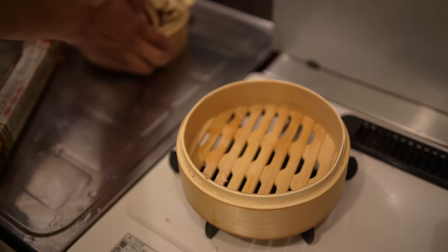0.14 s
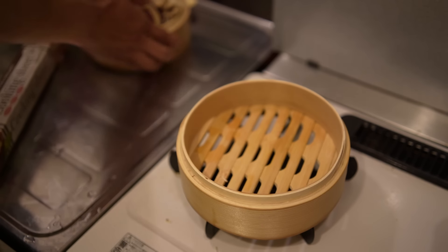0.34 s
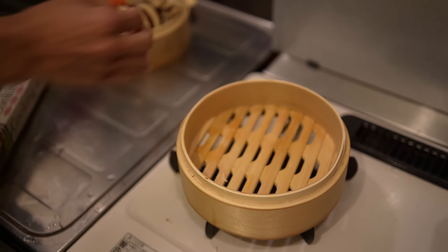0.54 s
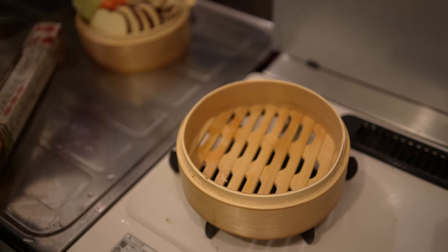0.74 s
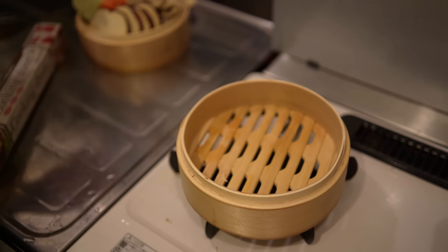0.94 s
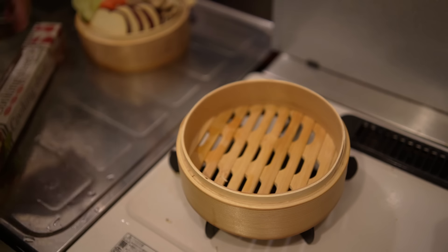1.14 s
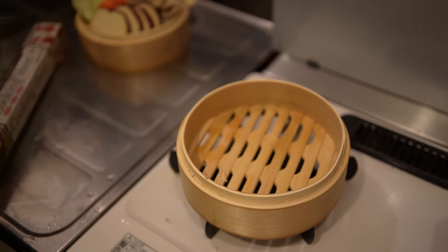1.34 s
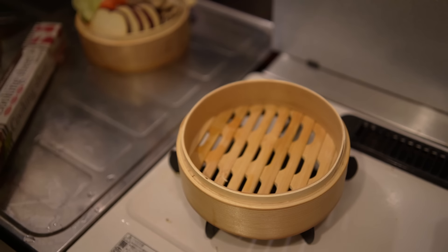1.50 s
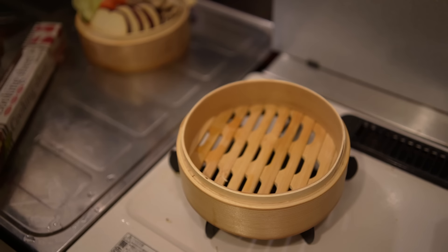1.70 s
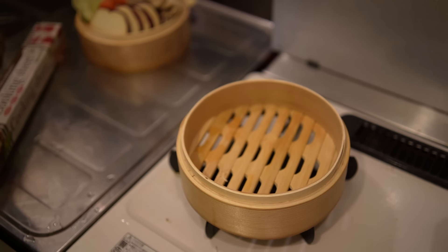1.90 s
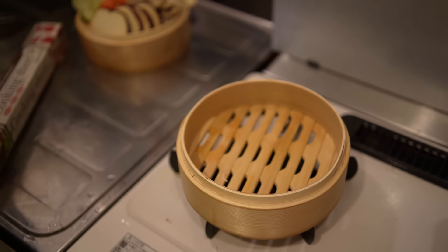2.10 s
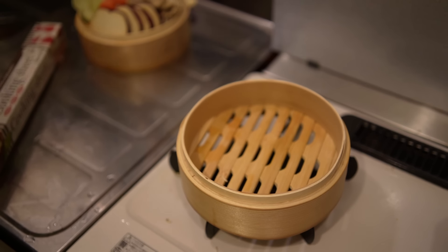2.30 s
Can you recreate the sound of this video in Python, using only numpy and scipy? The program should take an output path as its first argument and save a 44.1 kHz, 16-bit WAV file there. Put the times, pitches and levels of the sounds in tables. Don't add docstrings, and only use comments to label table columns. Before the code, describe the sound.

A hollow wooden knock as a bamboo steamer basket is set down on a steel counter

```python
import sys
import numpy as np
from scipy import signal
from scipy.fft import rfft, irfft
from scipy.io import wavfile
from scipy.ndimage import uniform_filter1d

SR = 44100
rng = np.random.default_rng(int(sys.argv[2]) if len(sys.argv) > 2 else 0)


def gain_from_decibels(decibels):
    exponent = np.asarray(decibels, float) / 20
    return 10 ** exponent


def wav_out(sig):
    wavfile.write(sys.argv[1], SR, np.round(np.clip(np.atleast_2d(sig).T, -1, 1) * 32767).astype(np.int16))


N = 103635


def basket_set_down():
    # (time [s], level [dB], push [ms], rattle [ms])
    contacts = [
        (.3975, -36, 0.46, 9),
        (.4015, -28.5, 0.31, 12),
        (.4045, -22, 1.66, 7.6),
        (.410, -30.5, 2.2, 4.1),
        (.4155, -27.5, 1.14, 10),
        (.432, -35.5, 1.2, 30),
        (.44, -41, 1.18, 10.6),
    ]
    # (frequency [Hz], level [dB], decay t60 [s])
    basket_modes = [(146.6, -2, 0.26), (260.7, 2, 0.31), (404, -8, 1), (499, 1, 0.18), (553.4, -25, 0.47),
                    (660.6, -19, 0.62), (741.7, 4, 0.13), (942, -7, 0.31), (1241, 4.5, 0.18),
                    (1316, -17, 0.26), (1250, -18.5, 0.34), (1540, -17.5, 0.16), (1610, 9, 0.12),
                    (2117, -4, 0.26)]
    # (frequency [Hz], level [dB], decay t60 [s])
    panel_modes = [(267, 8.5, 0.047), (118, -13, 0.37), (146.7, -22.5, 4.2), (189, -11, 0.46),
                   (365, 1, 0.089), (442, 5, 0.28), (560, -13, 1.12), (695, -14, 2), (937, 6, 0.34),
                   (1800, 7, .1)]
    shortened = [(hz, db, 0.72 * t60) for hz, db, t60 in basket_modes]
    return gain_from_decibels(14) * struck(contacts, shortened + list(panel_modes), crack_db=7, room_db=0.58, snap_db=-3)


def rim_touch():
    # (time [s], level [dB], push [ms], rattle [ms])
    contacts = [
        (.1893, -26, 1.9, 4),
        (.193, -40, .4, 16),
        (.205, -33, 1.8, 8),
        (.236, -32, 2, 8),
        (.2708, -36, 2, 8),
    ]
    # (frequency [Hz], level [dB], decay t60 [s])
    rim_modes = [(270, 13, .03), (151, -4, .3), (204, -4, .15), (258, 0, .18), (340, -4, .13),
                 (474, -11, .25), (590, -8, .25), (1163, -8, .1)]
    touch = gain_from_decibels(10) * struck(contacts, rim_modes, crack_db=1, room_db=-1, snap_db=-18)
    return high_pass(touch, 95)


def cupboard_bumps():
    # (time [s], level [dB], push [ms], rattle [ms])
    contacts = [
        (1.775, -48, 2.9, 120),
        (1.876, -36, 1.8, 24),
        (1.93, -38, 5.1, 17),
        (1.979, -34, 0.2, 39),
        (2.014, -30.5, 0.31, 6.6),
        (2.022, -25.5, 1.4, 6.5),
        (2.058, -35, 3, 19),
        (2.085, -46, 13, 25),
        (2.13, -42, 3.4, 20),
    ]
    # (frequency [Hz], level [dB], decay t60 [s])
    front_modes = [(301, 12.5, 0.029), (48, -5, 0.075), (84, -8.5, 0.17), (146.5, -8.5, 0.11),
                   (205, -8, 0.072), (271, -4, 0.13), (380, 4, 0.077), (502, 7, 0.033), (1120, -23, 0.068),
                   (1810, -12.5, 0.17), (2370, 1, 0.079)]
    return gain_from_decibels(8) * struck(contacts, front_modes, crack_db=0.68, room_db=-1.0, snap_db=-18)


def struck(contacts, modes, crack_db, room_db, snap_db):
    # (frequency [Hz], level [dB])
    crack_colour = [(30, -73), (70, -13.5), (200, 5), (900, 8), (2200, 3.5), (4000, -7), (16000, -1)]
    # (frequency [Hz], level [dB])
    snap_colour = [(2000, -7), (5000, -2.5), (16000, -10)]
    force, sharp = np.zeros(N + 5000), np.zeros(N + 5000)
    t_ms = np.arange(4096) / SR * 1000
    for start_s, db, push_ms, rattle_ms in contacts:
        start = int(start_s * SR)
        sparse = rng.random(4096) < .2
        taps = rng.standard_normal(4096) * sparse * .13 * np.exp(-t_ms / rattle_ms)
        sharp[start:][:4096] += taps * gain_from_decibels(db) / push_ms
        taps[0] = 1
        push = np.sin(np.pi * np.clip(t_ms[:400] / push_ms, 0, 1)) ** 2
        hit = np.convolve(taps, push / np.sqrt(np.sum(push ** 2))) * gain_from_decibels(db)
        force[start:][:len(hit)] += hit
    crack = colour(force[:N], crack_colour) * gain_from_decibels(crack_db)
    crack = crack + colour(sharp[:N], snap_colour) * gain_from_decibels(snap_db)
    ringing = signal.fftconvolve(force, ring(modes))[:N]
    return ringing + crack + gain_from_decibels(room_db) * room(crack)


def ring(modes, length_s=0.86):
    t = np.arange(int(length_s * SR)) / SR
    h = np.zeros(len(t))
    for hz, db, t60 in modes:
        h += gain_from_decibels(db - 60 * t / np.clip(t60, .02, 2.)) * np.sin(2 * np.pi * hz * t)
    return h / np.sqrt(np.sum(h ** 2))


def scuffs():
    # (start [s], swell [s], hold [s])
    motions = [
        (1.716, .018, .058),
        (1.839, .005, .046),
        (1.978, .0015, .004),
        (2.012, .0015, .012),
        (2.062, .014, .005),
        (2.105, .04, .034),
        (2.228, .02, .008),
    ]
    # (hiss [dB], rasp [dB], grit [dB])
    strengths = [
        (-48, -47.5, 1.5),
        (-42.5, -47, 2.3),
        (-63, -43, .8),
        (-62, -41, -2),
        (-40, -51, 3.5),
        (-40.5, -53.5, -1),
        (-41.5, -51.5, 2.5),
    ]
    # (frequency [Hz], level [dB])
    hiss_colour = [(2000, -30), (6000, 5.5), (10000, 4), (13000, 8), (16000, 18)]
    # (frequency [Hz], level [dB])
    rasp_colour = [(600, -3), (1300, -3.5), (1900, 2), (3000, 3), (6000, 2), (10000, -2), (16000, -8)]
    hiss_t60_s, rasp_t60_s = .14, 0.34
    t, hiss, rasp = np.arange(N) / SR, np.zeros(N), np.zeros(N)
    for (start, swell, hold), (hiss_db, rasp_db, grit_db) in zip(motions, strengths):
        rise = np.clip((t - start) / swell, 0, 1) ** 1.4
        after = np.maximum(t - start - swell - hold, 0)
        hiss_flutter_db = 1.1 * grit_db * np.clip(walk(300), -3, 1.6)
        hiss_gain = gain_from_decibels(hiss_db - 60 * after / hiss_t60_s + hiss_flutter_db)
        rasp_gain = gain_from_decibels(rasp_db - 60 * after / rasp_t60_s + walk(100))
        hiss += rise * hiss_gain * fibres(grit_db)
        rasp += rise * rasp_gain * fibres(0.85)
    return gain_from_decibels(-2.5) * colour(hiss, hiss_colour) + gain_from_decibels(6) * colour(rasp, rasp_colour)


def sleeve():
    # (time [s], level [dB])
    path = np.array([
        (0, -61),
        (.15, -70),
        (.3, -62.5),
        (.55, -63),
        (.7, -56),
        (.86, -64.5),
        (1.04, -71),
        (1.14, -61.5),
        (1.26, -76),
        (1.68, -93),
    ])
    # (frequency [Hz], level [dB])
    wool_colour = [(300, -43), (1500, -5.5), (4000, 10.5), (8000, 11), (12000, 9), (16000, 15.5)]
    path_db = np.interp(np.arange(N) / SR, path[:, 0], path[:, 1], right=-75)
    return colour(fibres(1.0), wool_colour) * gain_from_decibels(path_db - 2.0 + 0.62 * walk(5.3))


def fibres(grit_db):
    clicks_per_s = 2500
    size = gain_from_decibels(grit_db * np.minimum(rng.exponential(size=N), 3))
    size = size * (rng.random(N) < clicks_per_s / SR)
    clicks = size * np.clip(rng.standard_normal(N), -2, 2)
    return level(clicks + 0.2 * rng.standard_normal(N), 0)


def room(x):
    # (frequency [Hz], decay t60 [s])
    room_decay = [(60, 0.78), (250, 0.49), (700, 0.38), (2000, 0.32), (5000, 0.24), (12000, 0.092)]
    delay_s, late_db, late_stretch = 0.0017, -21.5, 2.5
    t = np.arange(SR) / SR
    spectrum = rfft(rng.standard_normal(SR))
    octave = np.log2(np.maximum(np.arange(SR // 2 + 1), 1))
    tail = np.zeros(SR)
    for centre in np.arange(5, 15, .5):
        band = irfft(spectrum * np.maximum(1 - 2 * abs(octave - centre), 0))
        t60 = shape(room_decay, 2 ** centre)
        tail += band * (gain_from_decibels(-60 * t / t60) + gain_from_decibels(late_db - 60 * t / t60 / late_stretch))
    tail *= np.clip(t / delay_s - 1, 0, 1)
    return signal.fftconvolve(x, tail / np.sqrt(np.sum(tail ** 2)))[:N]


def fan():
    # (frequency [Hz], level [dB])
    air_colour = [(20, 4), (48, -2), (150, -3), (700, -9), (1300, -16), (2200, -14.5), (5000, -19.5),
                  (16000, -22.5)]
    # (frequency [Hz], rms level [dB])
    hum = [(145.3, -65), (441.4, -65), (640.6, -68), (737.5, -73.5), (2137, -72), (2998, -80)]
    # (frequency [Hz], rms level [dB])
    whine = [(11520, -82), (11610, -83), (11870, -90), (11960, -76)]
    sound = level(colour(rng.standard_normal(N), air_colour), -51) * gain_from_decibels(.6 * walk(4))
    for hz, db in list(hum) + list(whine):
        phase = 2 * np.pi * np.cumsum(hz * (1 + 0.0011 * walk(4.9))) / SR
        sound = sound + np.sqrt(2) * gain_from_decibels(db + 2.2 * walk(5.78)) * np.sin(phase)
    return sound


def walk(rate):
    k = int(SR / rate)
    steps = np.repeat(rng.standard_normal(N // k + 1), k)
    return 1.3 * uniform_filter1d(uniform_filter1d(steps, k), k)[:N]


def level(x, db):
    return x * gain_from_decibels(db) / np.sqrt(np.mean(x ** 2))


def shape(table, hz):
    rows = np.array(table, float)
    return np.interp(np.log(np.maximum(hz, 1)), np.log(rows[:, 0]), rows[:, 1])


def colour(x, table, size=4096):
    cepstrum = irfft(np.log(gain_from_decibels(shape(table, np.fft.rfftfreq(size, 1 / SR)))))
    cepstrum[1:size // 2] *= 2
    cepstrum[size // 2 + 1:] = 0
    return signal.fftconvolve(x, irfft(np.exp(rfft(cepstrum))))[:len(x)]


def high_pass(x, hz):
    return signal.sosfilt(signal.butter(2, hz, "high", fs=SR, output="sos"), x)


def scene():
    knock = rim_touch() + basket_set_down()
    rub = scuffs()
    near = cupboard_bumps() + rub + gain_from_decibels(-13.5) * room(rub)
    return (near - knock + sleeve() + fan())[None]


def band_limit(x):
    return signal.sosfilt(signal.butter(12, 16620, fs=SR, output="sos"), x)


def record(dry):
    # (frequency [Hz], level [dB])
    port_colour = [(2300, 1.5), (2850, -3), (3900, -1), (4800, -7.5), (7300, -17), (9300, -13.5),
                   (12000, -1.5), (15000, 0)]
    null_hz, null_width_hz, top_hz = 8250, 900, 15740
    port = colour(high_pass(dry[0], 36), port_colour)
    port = signal.lfilter(*signal.iirnotch(null_hz, null_hz / null_width_hz, SR), port)
    mix = irfft(rfft(port) * (np.fft.rfftfreq(N, 1 / SR) < top_hz), N)
    return band_limit(mix[None])


dry = scene()
out = record(dry)
wav_out(out)
```